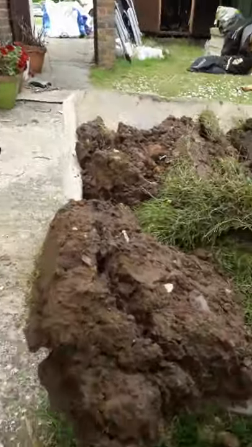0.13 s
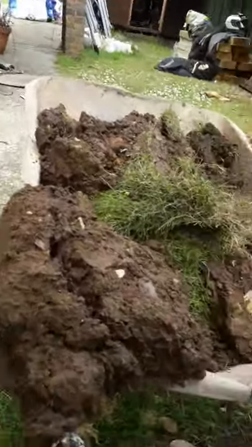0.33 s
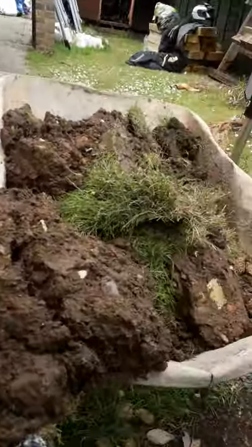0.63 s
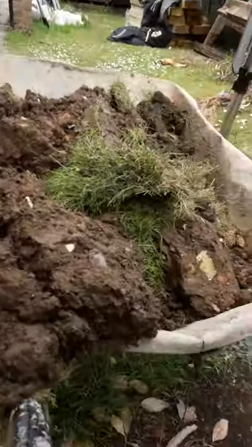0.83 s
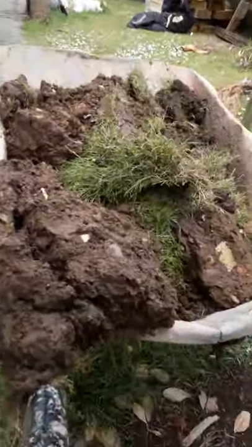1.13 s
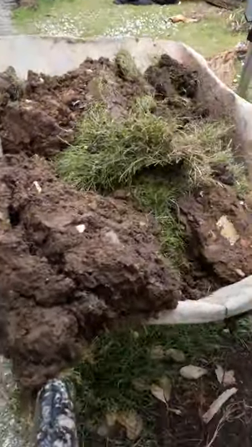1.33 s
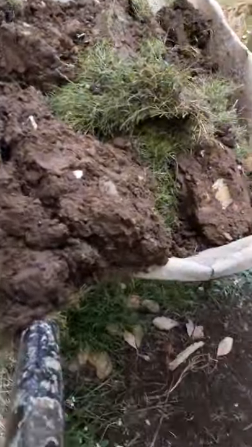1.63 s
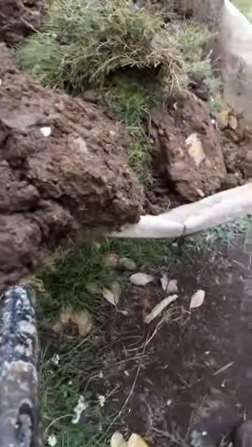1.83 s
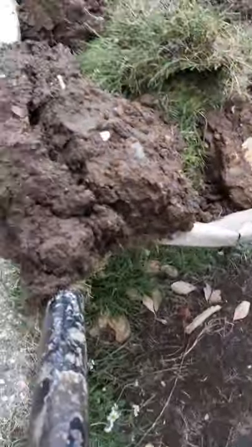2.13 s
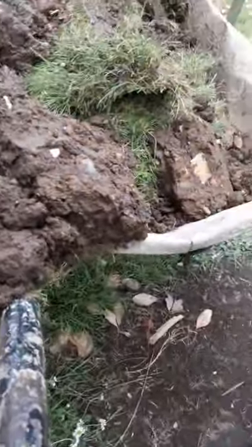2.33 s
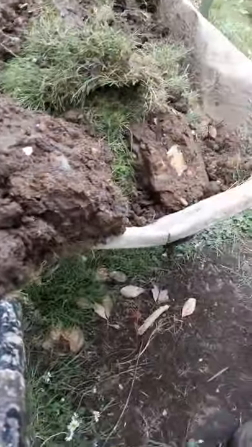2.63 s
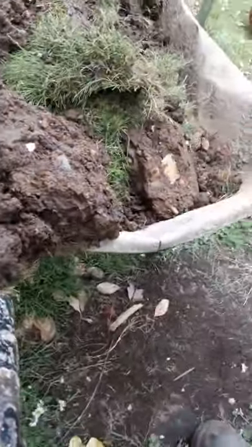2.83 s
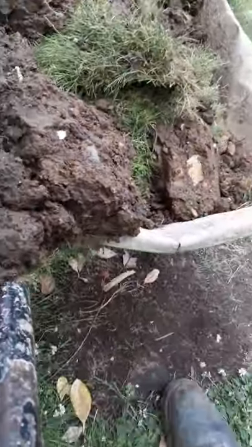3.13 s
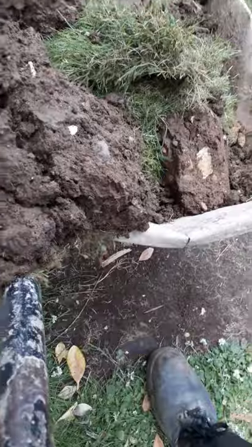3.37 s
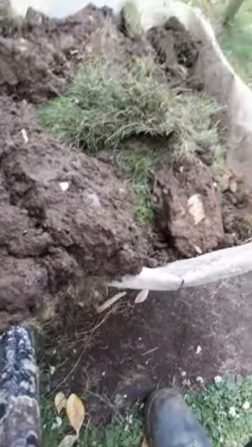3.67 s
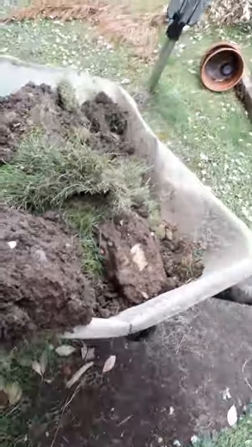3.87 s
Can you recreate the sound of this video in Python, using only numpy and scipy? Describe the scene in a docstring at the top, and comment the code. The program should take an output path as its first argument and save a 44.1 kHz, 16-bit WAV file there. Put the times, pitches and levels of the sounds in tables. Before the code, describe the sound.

A wheelbarrow rolls quietly at first, with a low rumble, rustling clothes and grass, small crunches, dull tray knocks and very faint birdlike notes. At about 2.7 seconds its dry wheel judders into a loud, steady, high squeal. Near 3.6 seconds the pitch sags into another judder, then a thinner, rising squeal runs from 3.75 to 4 seconds, with a thump just before the end.

```python
"""A garden, with a wheelbarrow of soil pushed across it. Faint thin notes, perhaps birds, and a low
rolling rumble sit at the back. Clothes and grass rustle, the ground crunches, crumbs tick, the tray knocks.
Then the dry axle sticks and slips: slow slips ring the wheel as a judder, lock into a loud squeal,
sag back into a judder and squeal again."""
import sys
import numpy as np
from scipy import signal
from scipy.fft import rfft, irfft
from scipy.io import wavfile
from scipy.ndimage import uniform_filter1d

SR = 44100
rng = np.random.default_rng(int(sys.argv[2]) if len(sys.argv) > 2 else 0)


def generate_wav(signal):
    """Clip the signal to [-1, 1] and save it as 16-bit WAV at the path in sys.argv[1]."""
    frames = np.transpose(np.atleast_2d(signal))
    scaled = np.clip(frames, -1, 1) * 32767
    pcm = np.round(scaled).astype(np.int16)
    wavfile.write(sys.argv[1], SR, pcm)


N = 176400
T = np.arange(N) / SR

# garden air tone: (frequency [Hz], relative level [dB])
AIR_COLOUR = [(100, -19), (320, -5), (420, -13), (900, -6.5), (1500, -12.5), (2500, -29), (3100, -22.5),
              (4000, -29), (8000, -20), (9500, -47), (15500, -18.5)]
# thin, far notes: (time [s], fade [s], frequency [Hz], bandwidth [Hz], level [dB])
BIRD_NOTES = [(.35, 0.037, 4780, 200, -51), (.5, 0.21, 4820, 260, -60), (.83, 0.1, 4845, 124, -50),
              (2.08, 0.11, 4800, 150, -50)]
# rolling and handling rumble: (time [s], level [dB])
RUMBLE_LEVELS = [(0, -62), (.24, -57.5), (.38, -67), (.46, -48.5), (.8, -57), (1.05, -61), (1.25, -65.5),
                 (1.4, -51.5), (1.7, -55.5), (1.84, -56.5), (2.05, -53.5), (2.2, -59.5), (2.44, -65),
                 (2.54, -56), (2.85, -54), (3.0, -62), (3.27, -55.5), (3.5, -64), (3.82, -52), (3.92, -49),
                 (3.97, -43), (4.0, -44)]
# its tone: (frequency [Hz], relative level [dB])
RUMBLE_COLOUR = [(25, -27.5), (50, -7), (80, -0.5), (125, -1.5), (200, -7.5), (350, -17), (800, -20.5),
                 (3000, -54.5)]
# bed of cloth and grass: (time [s], relative level [dB])
RUSTLE_LEVELS = [(0, -52.5), (.2, -53), (.28, -45), (.385, -55.5), (.42, -54.5), (.6, -46.5), (.69, -52),
                 (.74, -43.5), (.95, -57.5), (1.13, -60), (1.31, -55.5), (1.36, -51.5), (1.52, -51.5),
                 (1.6, -61), (1.72, -55), (1.8, -62), (1.85, -55.5), (2.0, -49.5), (2.12, -53),
                 (2.2, -59.5), (2.44, -58.5), (2.52, -57), (2.72, -61)]
# its tone: (frequency [Hz], relative level [dB])
RUSTLE_COLOUR = [(200, -15), (800, -1), (1600, -4.5), (3200, -2), (5000, 0.5), (6500, -3), (8000, 2),
                 (9200, -9), (12000, -1), (16000, -10.5)]
# brisk brushes of cloth and grass: (time [s], fade [s], level [dB], tilt [dB/octave])
BRUSHES = [(0.081, 0.08, -45, 4.5), (0.426, 0.047, -49, 8), (0.568, 0.042, -41, -0.5),
           (0.718, 0.025, -36.5, -1), (0.766, 0.026, -42, -2), (1.255, 0.05, -41, -0.5),
           (1.414, 0.19, -52.5, -2), (2.085, 0.082, -52.5, 2.5), (2.333, 0.066, -54, 1)]
# thin swishes: (time [s], fade [s], frequency [Hz], bandwidth [Hz], level [dB])
SWISHES = [(.075, 0.024, 8040, 600, -48), (.195, .04, 7770, 450, -53.5), (.25, 0.039, 8180, 450, -45),
           (.283, 0.037, 8200, 800, -40)]
# feet and tyre on the ground: (time [s], fade [s], frequency [Hz], bandwidth [Hz], level [dB])
SCUFFS = [(.19, 0.16, 2980, 2350, -50.5), (.63, 0.11, 2670, 1520, -51.5), (.92, 0.2, 2940, 2060, -58),
          (1.62, 0.15, 1000, 493, -57.5), (2.345, 0.048, 700, 493, -60)]
# twigs and crumbs: (time [s], peak level [dB], frequency [Hz])
CRUMB_TICKS = [(.133, -22, 3860), (.683, -31, 4270), (0.768, -23.5, 6200), (.916, -35, 3520),
               (.954, -35, 3150), (1.043, -40.5, 4540), (1.183, -31, 4200), (1.235, -29.5, 4000),
               (1.326, -33.5, 4140), (2.394, -38, 6950), (2.654, -38, 7600), (2.982, -31, 10500)]
# hits on the tray: (time [s], thud drive [dB], clack drive [dB], crack peak [dB])
TRAY_KNOCKS = [(.713, -27.5, -38, -40), (.731, -32, -47, -33), (1.133, -55, -46, -42),
               (1.230, -39, -37.5, -39), (1.329, -31.5, -39.5, -26.5), (1.579, -47, -48, -50),
               (1.606, -48, -42, -51), (1.632, -31, -44, -48), (1.821, -27, -34.5, -29),
               (2.142, -24.5, -42, -24), (2.237, -58, -30.5, -29.5), (3.268, -31, -49, -42),
               (3.337, -38, -42, -42), (3.85, -54, -36, -43), (3.943, -29, -47, -19),
               (3.946, -19, -22, -28)]
# low and mid tray modes: (frequency [Hz], relative level [dB], t60 [s])
THUD_MODES = [(132, -15.5, 0.05), (190, -7, 0.033), (331, -14, 0.037)]
CLACK_MODES = [(411, 0.5, 0.014), (596, 2, 0.027), (700, -0.5, 0.02), (951, -3, 0.021), (1410, -3.5, 0.012),
               (1870, -1.5, 0.0061)]
# judders before and after the first squeal: (time [s], slip rate [Hz], ring level [dB], rasp level [dB])
JUDDER_CURVES = [
    [(2.714, 203, -51, -78), (2.728, 172, -46, -62), (2.738, 165, -31, -47), (2.75, 166, -29, -34.5),
     (2.8, 171, -26, -34), (2.82, 165, -29, -38.5), (2.83, 176, -54, -33), (2.842, 150, -33, -63)],
    [(3.565, 864, -70, -50), (3.605, 690, -48, -29.5), (3.622, 450, -32, -33), (3.64, 196, -31, -35),
     (3.652, 164, -33, -40), (3.672, 190, -49, -57.5), (3.735, 220, -55.5, -76)],
]
# looseness of each judder: (spread of slip spacing [ratio])
SLIP_SPREADS = [0.007, 0.058]
# wheel and frame modes: (frequency [Hz], weight in first judder [dB], weight in second [dB], t60 [s])
WHEEL_MODES = [(182.6, -16.5, -4, 0.089), (358, -28.5, -2, 0.25), (526, -10.5, -6, 0.17),
               (700, 4.5, -2, 0.054), (854, 0, -24, 0.077), (1006, 2, 3, 0.025), (1170, -11.5, 1.5, 0.076),
               (1353, -13.5, -18, 0.056), (1531, -12.5, -18, 0.18), (1954, -12, -1, 0.027),
               (4294, -9, -13, 0.046)]
# tone of the frame's rasp: (frequency [Hz], relative level [dB])
RASP_COLOUR = [(600, 1), (1500, -1.5), (2500, -2), (3700, -2), (4250, 0), (5000, -6.5), (7800, -2),
               (9300, -23), (12000, -5.5), (16000, -9)]
# pitch line of each squeal: (time [s], slip rate [Hz])
SQUEAL_PITCHES = [
    [(2.82, 826), (2.842, 872), (2.86, 888), (2.966, 906), (3.124, 904), (3.148, 915), (3.41, 932),
     (3.553, 910), (3.565, 842), (3.588, 820), (3.597, 725), (3.612, 690)],
    [(3.738, 770), (3.761, 824), (3.78, 843), (3.829, 864), (3.839, 893), (3.865, 921), (3.915, 938),
     (4.0, 934)],
]
# envelopes of each squeal, before flares: (time [s], fundamental [dB], octave [dB], overtones [dB])
SQUEAL_LEVELS = [
    [(2.81, -31.5, -39, -56), (2.832, -23.5, -54, -41), (2.87, -19.5, -43, -33.5),
     (2.94, -15.7, -42.5, -35.5), (3.01, -13.5, -53, -36), (3.06, -13, -40, -33.5),
     (3.165, -15, -39.5, -32), (3.21, -20, -40.5, -33), (3.265, -28, -33, -27.5),
     (3.33, -25.5, -39.5, -32.5), (3.43, -21.5, -43.5, -32.5), (3.49, -23.5, -43.5, -33.5),
     (3.55, -27.5, -48, -40), (3.58, -49.5, -36.5, -30.5), (3.612, -35, -39.5, -52)],
    [(3.748, -39.5, -49, -35.5), (3.761, -39, -48.5, -30.5), (3.775, -42, -37.5, -29.5),
     (3.816, -40.5, -31.5, -29), (3.832, -40.5, -46.5, -38), (3.865, -32.5, -32, -35),
     (3.925, -34, -28, -39), (3.965, -31, -27.5, -33.5), (4.0, -35, -28, -33)],
]
# overtone balance of each squeal: (frequency [Hz], relative level [dB])
SQUEAL_COLOURS = [
    [(2000, 11), (2750, -6), (3700, -4), (4550, -11), (5450, -9.5), (6400, -11.5), (7300, -3.5), (8250, -8),
     (9200, -19), (10100, -15.5), (11000, -17.5), (11900, -4), (12800, -19.5), (13700, -17), (14700, -11.5),
     (15700, -18.5)],
    [(2000, -4.5), (2750, 2), (3700, -2.5), (4300, 2.5), (4700, -11.5), (5200, -4.5), (6400, -6), (7200, 3),
     (8400, -8), (9400, -26), (11000, -11.5), (12000, -9), (13500, -15), (15700, -11)],
]
# tone of the friction hiss: (frequency [Hz], relative level [dB])
FRICTION_COLOUR = [(300, 4.5), (1300, -5), (2600, -5), (8000, -6.5), (9500, -13.5), (12000, -7.5),
                   (16000, -18)]
# single harmonics flaring or dropping out: (time [s], fade [s], harmonic [number], gain [dB])
FLARES = [(2.833, 0.013, 5, 21.5), (2.874, 0.015, 4, -21), (2.896, .022, 3, -7), (2.903, 0.12, 7, 9.5),
          (2.942, 0.15, 6, 10), (2.982, 0.025, 5, -6), (3.009, 0.068, 3, 9.5), (3.02, 0.033, 7, -22),
          (3.095, 0.037, 13, 5.5), (3.1, 0.064, 15, 13.5), (3.113, 0.038, 9, 3.5), (3.123, 0.0114, 2, -16),
          (3.124, 0.073, 3, 9), (3.136, 0.22, 5, 9), (3.154, 0.04, 12, 13), (3.165, 0.027, 6, 14),
          (3.186, 0.0081, 3, -12.5), (3.204, .11, 4, 9), (3.267, 0.05, 3, -15.5), (3.33, 0.1, 12, 9.5),
          (3.339, .11, 16, 11), (3.417, 0.32, 3, 6.5), (3.457, 0.034, 4, -16), (3.503, .025, 5, -14),
          (3.568, 0.046, 4, -11), (3.575, .025, 5, 11), (3.807, 0.027, 6, 13), (3.807, 0.027, 8, 2),
          (3.839, 0.0058, 3, -18), (3.887, 0.034, 3, 9.5), (3.99, 0.13, 9, 13.5)]
# in-between tones from unequal alternate slips: (time [s], fade [s], pitch multiple [ratio], level [dB])
HALF_ORDERS = [(3.38, .2, 1.5, -54), (3.32, .3, 2.5, -47), (3.28, .38, 3.5, -47), (3.33, .22, 4.5, -56)]

FLUTTER_DB, FLUTTER_HZ = 1.4, 35  # base depth and speed of the overtone flicker
ROUGH_BELOW_HZ, ROUGH_RANGE_HZ = 895, 60  # slower slipping is less steady
JITTER, ROUGH_JITTER = 0.00054, 0.0043  # pitch wobble as a ratio, and the extra when rough
HISS_DB, ROUGH_HISS_DB = -20.5, 2  # hiss against the overtones, and the extra when rough


def from_db(db):
    """Decibels to gain."""
    return 10 ** (np.asarray(db) / 20)


def unit_rms(x):
    """Scale to unit power."""
    return x / np.sqrt(np.mean(x ** 2) + 1e-20)


def envelopes(rows):
    """One envelope for each column after the time."""
    times, *columns = np.transpose(rows)
    return [np.interp(T, times, column) for column in columns]


def colour_db(colour, hz):
    """Level of an EQ curve at hz."""
    points_hz, points_db = np.transpose(colour)
    return np.interp(np.log(hz), np.log(points_hz), points_db)


def gate(rows, fade_s=0.0083):
    """Open from the first to the last row of a curve."""
    return np.clip(1 + np.minimum(T - rows[0][0], rows[-1][0] - T) / fade_s, 0, 1)


def drift(hz):
    """Smooth random modulation of unit power."""
    pole = np.exp(-80 * np.pi * hz / SR)  # one control point every 40 samples
    slow = signal.lfilter([1], [1, -2 * pole, pole * pole], rng.standard_normal(N // 40 + 2002))[2000:]
    return np.interp(np.arange(N) / 40, np.arange(len(slow)), unit_rms(slow))


def noise(colour, tilt_db=0, size=N):
    """Coloured noise of unit power, tilted per octave above 1 kHz."""
    hz = np.maximum(np.fft.rfftfreq(size, 1 / SR), 10)
    shape = from_db(colour_db(colour, hz) + tilt_db * np.log2(np.maximum(hz, 1000) / 1000))
    bass_loss = 1 + (colour[0][0] / 2 / hz) ** 2
    return unit_rms(irfft(rfft(rng.standard_normal(size)) * shape / bass_loss, size))


def ring(clicks, hz, t60):
    """One mode: each click rings a dying sine."""
    r, w = from_db(-60 / (t60 * SR)), 2 * np.pi * hz / SR
    return signal.lfilter([0, np.sin(w)], [1, -2 * r * np.cos(w), r * r], clicks + 1e-18)


def clicks_at(times, gains):
    """Impulses placed between samples."""
    out, at = np.zeros(N + SR), np.asarray(times) * SR
    np.add.at(out, at.astype(int), gains * (1 - at % 1))
    np.add.at(out, at.astype(int) + 1, gains * (at % 1))
    return out[:N]


def swell(at, fade, rise=1):
    """A bell-shaped envelope; rise is its attack time as a share of its fade."""
    width = np.where(T < at, rise * fade, fade)
    return np.exp(-2 * np.minimum(((T - at) / width) ** 2, 20))


def noise_swells(rows):
    """Short swells of noise, each in its own band."""
    out = 0
    for at, fade, hz, width, db in rows:
        band = signal.butter(2, [hz - width / 2, hz + width / 2], "band", fs=SR, output="sos")
        out += from_db(db) * swell(at, fade) * unit_rms(signal.sosfilt(band, rng.standard_normal(N)))
    return out


def snap(at, db, hz, t60, order=1, size=2048):
    """A sharp contact and a broad burst that dies at once."""
    burst = rng.standard_normal(size) * from_db(-60 * T[:size] / t60)
    burst[0] = 4.2  # the edge of first contact
    band = signal.butter(order, [hz * 0.74, min(hz * 1.42, SR / 2 - 1000)], "band", fs=SR, output="sos")
    burst = signal.sosfilt(band, burst)
    out, start = np.zeros(N + SR), int(at * SR)
    out[start:start + size] = from_db(db) * burst / np.abs(burst).max()
    return out[:N]


def garden():
    """A quiet bed of air with thin, birdlike notes far off."""
    return from_db(-60) * noise(AIR_COLOUR) + noise_swells(BIRD_NOTES)


def rolling():
    """Lumpy rumble of rolling and handling, and a low bump as the tyre drops into a dip."""
    level_db, = envelopes(RUMBLE_LEVELS)
    rumble = unit_rms(noise(RUMBLE_COLOUR) * from_db(3.5 * drift(hz=7.5)))
    bump = ring(clicks_at(times=[3.945], gains=from_db(-34)), hz=78, t60=0.25)
    return from_db(level_db) * rumble + bump


def rustles():
    """Cloth and grass rub: a grainy bed, brisker brushes and thin swishes on top."""
    level_db, = envelopes(RUSTLE_LEVELS)
    bed = from_db(level_db - 3.5) * noise(RUSTLE_COLOUR)
    brushes = sum(from_db(db) * swell(at, fade, rise=0.53) * noise(RUSTLE_COLOUR, tilt)
                  for at, fade, db, tilt in BRUSHES)
    grain = unit_rms(from_db(2.5 * drift(hz=320)))
    return (bed + brushes) * grain + noise_swells(SWISHES)


def ground():
    """Feet and tyre crunch; twigs and crumbs tick."""
    grain = unit_rms(from_db(2.5 * drift(hz=230)))
    ticks = sum(snap(at, db, hz, t60=0.007, order=2) for at, db, hz in CRUMB_TICKS)
    return noise_swells(SCUFFS) * grain + ticks


def tray():
    """Knocks on the soil-damped tray, each a thud, a clack and a crack."""
    times, thud_db, clack_db, crack_db = np.transpose(TRAY_KNOCKS)
    out = sum(snap(at, db, hz=4200, t60=0.0048) for at, db in zip(times, crack_db))
    for modes, drive_db in ((THUD_MODES, thud_db), (CLACK_MODES, clack_db)):
        for k, (hz, db, t60) in enumerate(modes):
            hits = from_db(drive_db + db + rng.normal(-2, 3, len(times)))
            out += (-1) ** k * ring(clicks_at(times, hits), hz, t60)
    return out


def levelled(x):
    """Ride the gain to hold the short-term power steady."""
    return x / np.sqrt(np.abs(uniform_filter1d(x * x, size=800)) + 1e-6)


def judder(curve, spread, weights_db, rasp_t60=0.032, size=1024):
    """Slow stick-slip: each separate slip rings the wheel and rasps the frame."""
    slip_hz, ring_db, rasp_db = envelopes(curve)
    at, times = curve[0][0], []
    while at < curve[-1][0]:
        times.append(at)
        at += np.exp(rng.normal(0, spread)) / slip_hz[int(at * SR)]
    slips = clicks_at(times, from_db(rng.normal(0, 1.8, len(times))))
    wheel = sum((-1) ** k * from_db(weights_db[k]) * ring(slips, hz, t60)
                for k, (hz, _, _, t60) in enumerate(WHEEL_MODES))
    frame = noise(RASP_COLOUR, size=size) * from_db(-60 * T[:size] / rasp_t60)
    rasp = levelled(signal.fftconvolve(slips, frame)[:N]) + 0.4 * noise(RASP_COLOUR)
    return gate(curve) * (from_db(ring_db) * levelled(wheel) + from_db(rasp_db) * rasp)


def frame_phasing(k):
    """The frame carries harmonic k by two paths; as they shift it holds, then dips for a moment."""
    echo = np.clip(0.11 * (k - 2), 0, 0.88)
    angle = 2 * np.pi * rng.random() + 2.4 * drift(hz=3)
    return (1 + echo * np.exp(1j * angle)) / np.sqrt(1 + echo ** 2)


def flare(k):
    """Gain of harmonic k as it catches a frame resonance or drops out."""
    return from_db(sum(db * swell(at, fade) for at, fade, harmonic, db in FLARES if round(harmonic) == k))


def overtones(hz, phase, colour):
    """The squeal's bright edge: harmonics 3 to 18, each flaring, flickering and phasing on its own."""
    out, power = 0, 1e-12
    for k in range(3, 19):
        gain = from_db(colour_db(colour, k * hz))
        flutter = from_db(FLUTTER_DB * (1 + k / 10) * drift(FLUTTER_HZ))
        partial = np.real(frame_phasing(k) * np.exp(1j * (k * phase + 2 * np.pi * rng.random())))
        out += gain * flare(k) * flutter * partial
        power += gain ** 2
    return out / np.sqrt(power)


def squeal(pitch, levels, colour):
    """Locked stick-slip: a fundamental, its harmonics, tones between them and hiss pulsing at each slip."""
    hz, = envelopes(pitch)
    rough = np.clip((ROUGH_BELOW_HZ - hz) / ROUGH_RANGE_HZ, 0, 1)
    wobble = (JITTER + ROUGH_JITTER * rough) * drift(hz=66)
    phase = 2 * np.pi * np.cumsum(hz * (1 + wobble)) / SR
    fundamental_gain, octave_gain, edge_gain = from_db(envelopes(levels))
    body = fundamental_gain * np.sin(phase) + octave_gain * flare(2) * np.sin(2 * phase)
    edge = edge_gain * overtones(hz, phase, colour)
    between = sum(from_db(db + FLUTTER_DB * drift(2 * FLUTTER_HZ)) * swell(at, fade) * np.sin(k * phase)
                  for at, fade, k, db in HALF_ORDERS)
    hiss = from_db(HISS_DB + ROUGH_HISS_DB * rough) * noise(FRICTION_COLOUR) * (1 + 0.89 * np.cos(phase))
    return gate(levels) * (np.sqrt(2) * (body + edge + between) + edge_gain * hiss)


def axle():
    """The dry bearing sticks and slips: two squeals, each led in by a judder."""
    squeals = sum(squeal(*parts) for parts in zip(SQUEAL_PITCHES, SQUEAL_LEVELS, SQUEAL_COLOURS))
    weights_db = np.transpose(WHEEL_MODES)[1:3]
    judders = sum(judder(*parts) for parts in zip(JUDDER_CURVES, SLIP_SPREADS, weights_db))
    return squeals + judders


def scene():
    """The mono mix, from the garden bed up to the axle."""
    return (garden() + rolling() + rustles() + ground() + tray() + axle())[None]


def record(dry, low_cut_hz=40, high_cut_hz=15850):
    """The microphone loses the deep bass; the top is cut steeply."""
    thinned = signal.sosfilt(signal.butter(2, low_cut_hz, "high", fs=SR, output="sos"), dry)
    return signal.sosfilt(signal.ellip(12, 0.1, 80, high_cut_hz, fs=SR, output="sos"), thinned)


dry = scene()
out = record(dry)
generate_wav(out)
```